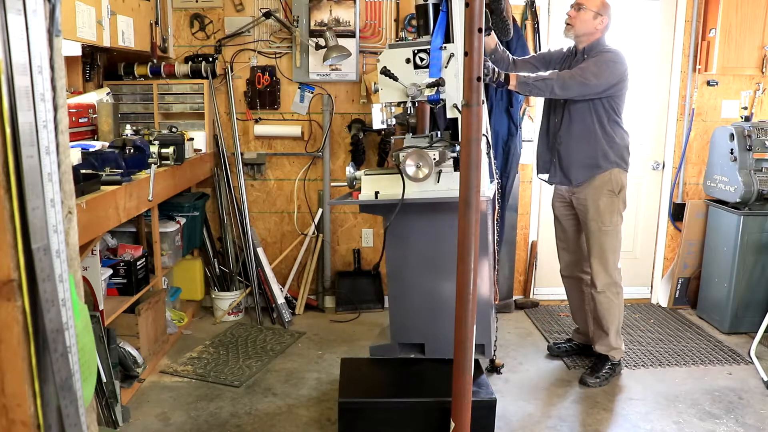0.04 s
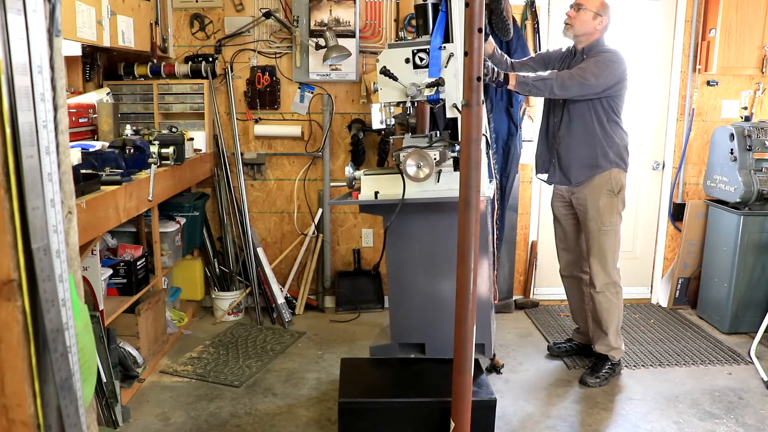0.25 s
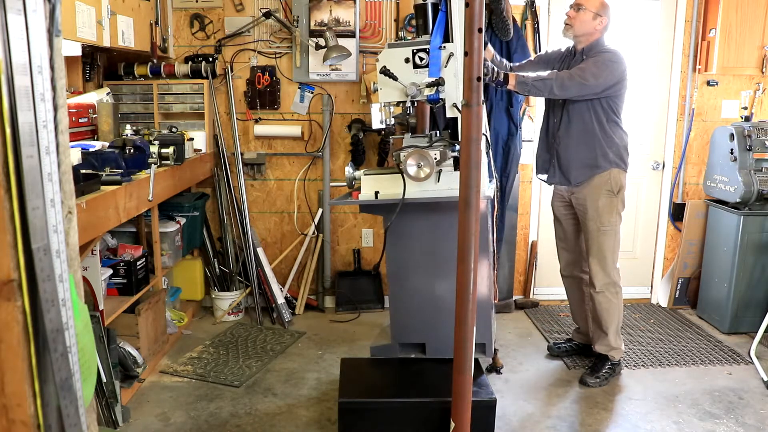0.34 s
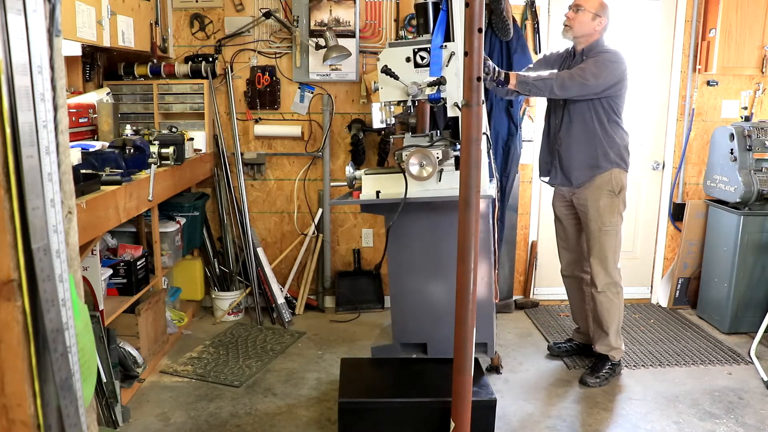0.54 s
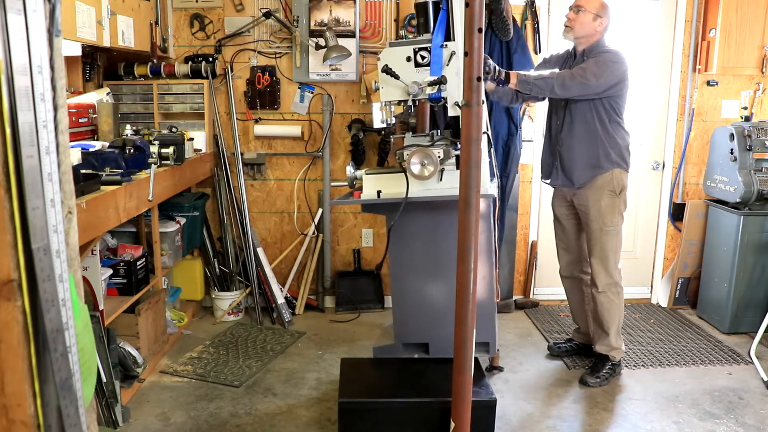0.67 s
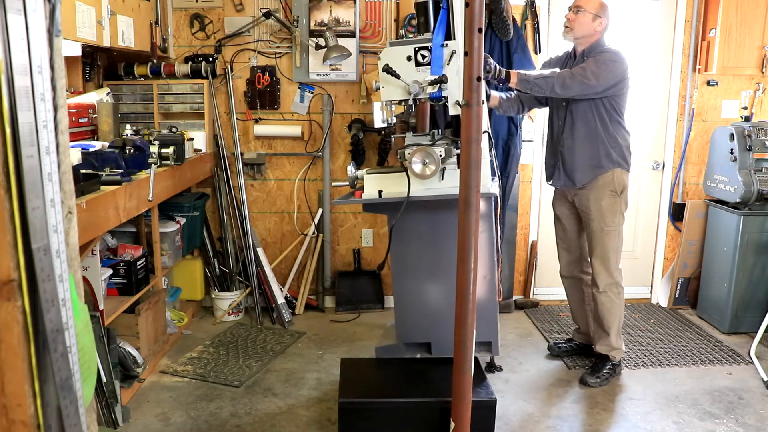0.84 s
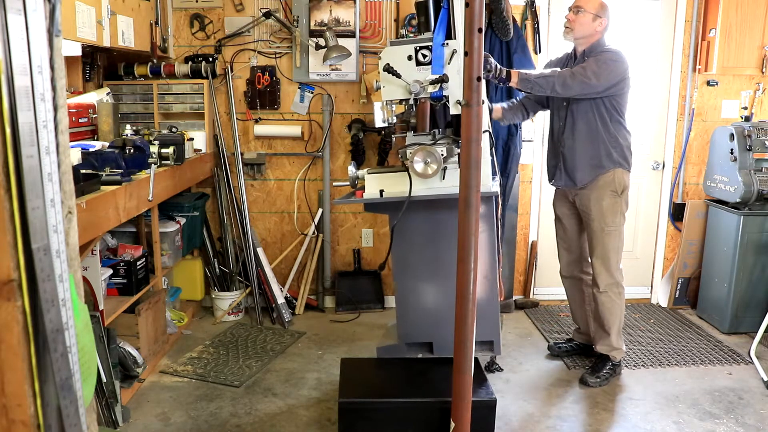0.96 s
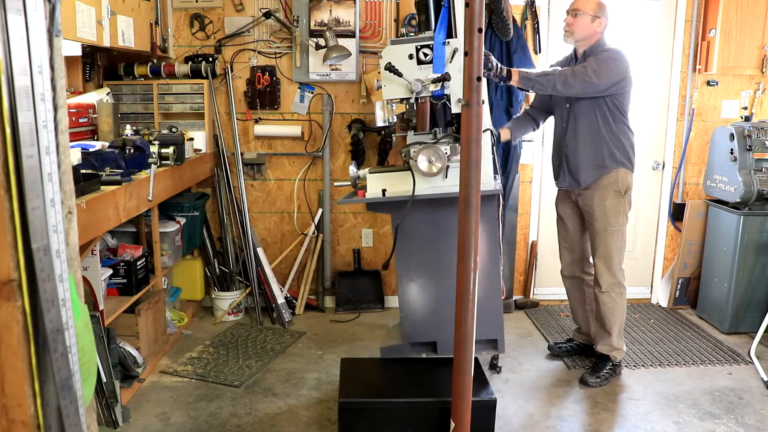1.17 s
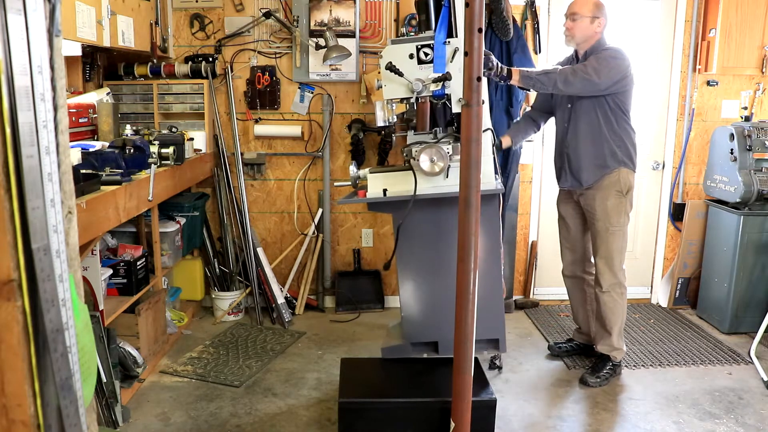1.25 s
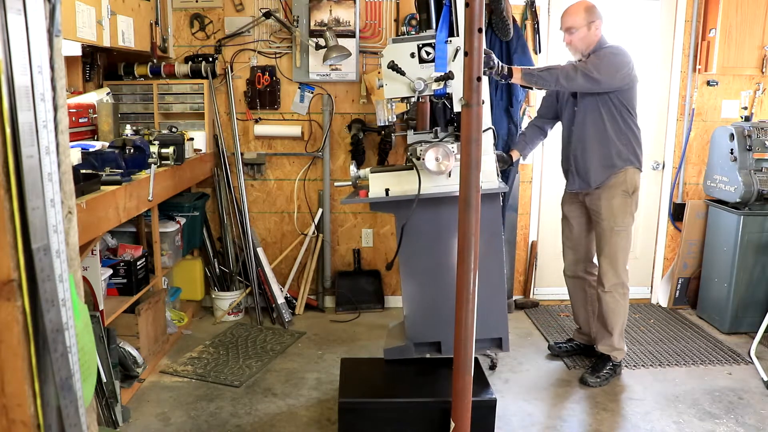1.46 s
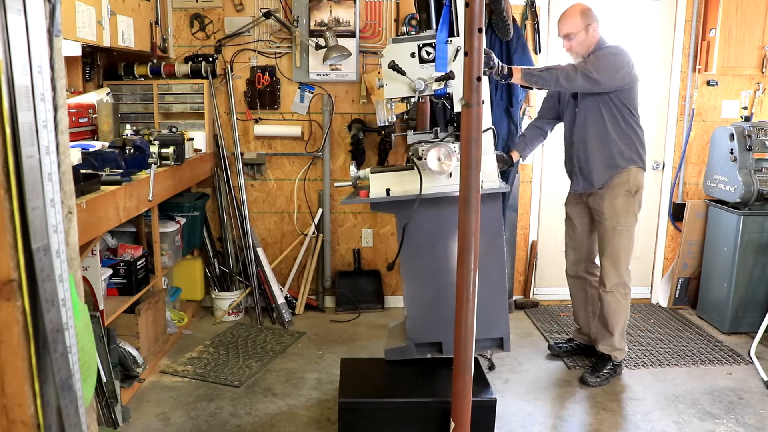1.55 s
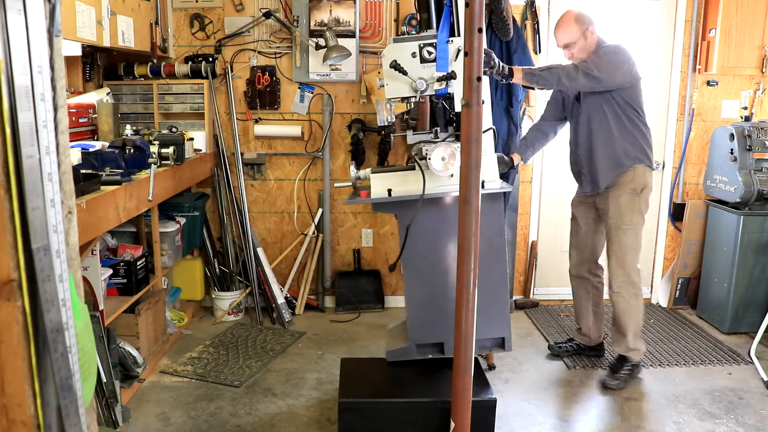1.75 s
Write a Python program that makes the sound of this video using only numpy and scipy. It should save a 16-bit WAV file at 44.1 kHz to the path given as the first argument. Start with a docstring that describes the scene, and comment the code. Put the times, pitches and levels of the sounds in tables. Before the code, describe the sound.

Rapid ratchet ticks and clanking links as a chain is hauled through a hoist, then stops

```python
"""Hand chain hoist, one pull

A hand chain is hauled once through a hoist in a cluttered workshop: pawl ticks and link clanks (short noise cracks
over bounced metal modes), housing ring (decaying sines), slack chain (dense random clinks), thuds (tone plus noise).
A late clank and thud follow. Low noise rumbles under the pull, the room adds a decaying noise tail,
and the previous pull dies away as fading noise over a quiet noise floor."""
import sys
import numpy as np
from scipy import signal
from scipy.fft import rfft, irfft
from scipy.io import wavfile
from scipy.ndimage import uniform_filter1d

SR = 44100
rng = np.random.default_rng(int(sys.argv[2]) if len(sys.argv) > 2 else 0)


def materialize(psi):
    """Save the field psi as 16-bit PCM at rate SR to the path in sys.argv[1].

    A 1-D psi becomes a single channel; in a 2-D psi each row is a channel.
    """
    bounded = np.clip(np.atleast_2d(psi).T, -1, 1)
    quanta = np.round(bounded * 32767).astype(np.int16)
    wavfile.write(sys.argv[1], SR, quanta)


N = 79380
HIT_SIZE = 8192  # samples per blow

# pawl ticks: start_s, level_db, housing_ring_db, hollow_knock_db, chatter_s
PAWL_TICKS = [(0.198, -30, -33, -53, 0.0032), (0.2196, -13.5, -44, -30, 0.0032),
              (0.2469, -9.5, -51, -31, 0.0046), (0.2843, -35, -9, -11, 0.0067),
              (0.3034, -7, -41, -17, 0.0052), (0.339, -6.5, -41, -29, 0.0039),
              (0.3751, -9, -22, -8.5, 0.007), (0.4157, -9.5, -30.5, -16.5, 0.0041),
              (0.4542, -8.5, -24, -14, 0.0058), (0.5072, -4.5, -41, -16.5, 0.0039),
              (0.5506, -6.5, -24, -23, 0.0049), (0.5856, -6.5, -21, -19.5, 0.0035),
              (0.6179, -6.5, -14.5, -21, 0.0034), (0.647, -7.5, -26, -47, 0.0062),
              (0.6771, -6.5, -33, -14.5, 0.0052), (0.7107, -7, -16, -15, 0.0028),
              (0.7335, -6.5, -45, -12, 0.0049), (0.7665, -6, -34, -11, 0.0039),
              (0.791, -6, -12.5, -9.5, 0.0036), (0.823, -5, -46, -10.5, 0.0026),
              (0.8545, -5, -40, -25, 0.0024), (0.8813, -6, -12.5, -19, 0.0048),
              (0.9117, -7, -22, -11.5, 0.0035), (0.9408, -5, -47, -29, 0.0038),
              (0.9621, -9, -33, -12.5, 0.0074), (0.99, -6.5, -31, -42, 0.0046),
              (1.016, -5, -16.5, -23, 0.0024), (1.037, -4.5, -16, -16, 0.0046),
              (1.0618, -9, -16, -35, 0.0042), (1.0817, -5.5, -49, -41, 0.0097),
              (1.102, -7, -50, -25.5, 0.0054), (1.1254, -5, -22.5, -19, 0.0035),
              (1.149, -6.5, -44, -19, 0.0036), (1.1741, -11, -13, -33, 0.0092),
              (1.203, -9.5, -12, -24, 0.0048), (1.23, -10.5, -14.5, -18, 0.0081),
              (1.2596, -5, -14, -19, 0.0064), (1.2864, -10, -15, -13.5, 0.0048),
              (1.3216, -9, -38, -28, 0.0021), (1.35, -8, -33, -10.5, 0.0038),
              (1.3802, -8.5, -25, -34, 0.0054), (1.4106, -9.5, -31, -10.5, 0.0045),
              (1.4425, -10, -24, -14, 0.0037), (1.527, -35, -26, -12, 0.0029),
              (1.593, -21.5, -24, -10, 0.0038), (1.6184, -50, -14, 2, 0.0036),
              (1.6367, -33, -32, -7, 0.0035), (1.7833, -36, -25, -28, 0.0032)]
# link clanks: start_s, level_db, low_housing_ring_db, high_housing_ring_db, brightness_db, chatter_s
LINK_CLANKS = [(0.1477, -25, -21, -8, -2.5, 0.0067), (0.2182, -22.5, -39, 0, 14, 0.0021),
               (0.241, -18, -38, -12, 1, 0.0047), (0.2622, -12, -34, -27, 2.5, 0.005),
               (0.2845, -13, -18, -7, -7.5, 0.0051), (0.3358, -9.5, -48, -11, -0.5, 0.008),
               (0.365, -12, -34, -8, -5, 0.0038), (0.3811, -8.5, -14.5, -20, -5, 0.0061),
               (0.4388, -2, -41, -17, 2.7, 0.0046), (0.5002, -8.5, -7.5, -11, -1.5, 0.0076),
               (0.5638, -2.5, -37, -17.5, 5.5, 0.0039), (0.6033, -3.5, -15, -10, 3.5, 0.0081),
               (0.6525, -9.5, -33, -3, -1, 0.0096), (0.685, -6, -40, -23, -0.7, 0.01),
               (0.7245, -8, -31, -10.5, 3, 0.0049), (0.764, -4, -7, -12, -2, 0.0042),
               (0.8123, -10.5, -14, -16, -3, 0.0062), (0.8557, -7, -43, -12.5, -2.5, 0.0036),
               (0.8891, -5, -9, -18, -3, 0.0049), (0.9615, -4, -12, -42, 0, 0.0034),
               (1.0272, -3, -13.5, -11.5, 6, 0.0091), (1.0834, -8.5, -45, 1.5, -2.5, 0.0068),
               (1.1175, -5, -39, -10.5, -1.5, 0.0048), (1.1861, -7, -15.5, -5.5, -6, 0.0067),
               (1.2329, -14, -27, -28, -5.5, 0.0084), (1.263, -9.5, -31, -9, -8, 0.005),
               (1.3025, -12.5, -11, -29, -8, 0.0036), (1.3434, -5, -11, -8.5, -5.5, 0.0055),
               (1.4193, -9.5, -6.5, -23, -2.3, 0.01), (1.5644, -14.5, -9.5, -10, -3.5, 0.0078)]
# pawl resonances: pitch_hz, level_db, t60_s
PAWL_RESONANCES = [(5400, -9, .02), (6100, -8, .02), (6700, -3, .022), (7050, -2, .03), (7700, -4, .022),
                   (8330, -3, .02), (9220, -5, .02), (10500, -7, .015), (11300, -9, .015),
                   (12600, -18, .015)]
# chain link resonances: pitch_hz, level_db, t60_s
LINK_RESONANCES = [(1805, -4, .035), (2440, -12, .045), (2735, -6, .055), (3232, -4, .05), (3390, -6, .04),
                   (3612, -4, .04), (3868, -2, .05), (4200, -5, .035), (4530, -2, .05), (4990, -5, .04)]


def undb(db):
    """dB to amplitude gain."""
    return 10 ** (np.asarray(db) / 20)


def fall(t60_s, size=HIT_SIZE):
    """Exponential decay, 60 dB down at t60_s."""
    return np.exp(-np.log(1000) * np.arange(size) / SR / t60_s)


def swell(rise_s, size=HIT_SIZE):
    """Exponential approach to 1 with time constant rise_s."""
    return 1 - np.exp(-np.arange(size) / SR / rise_s)


def shape(x, spectrum):
    """Filter x by a (pitch_hz, level_db) table, interpolated over log frequency."""
    hz, db = np.array(spectrum, float).T
    size = x.shape[-1]
    bin_hz = np.maximum(np.arange(size // 2 + 1) * SR / size, 1)
    gain = undb(np.interp(np.log(bin_hz), np.log(hz), db))
    return irfft(rfft(x) * gain, size)


def colour(x, spectrum):
    """Shape x by a spectrum, to rms 1 overall."""
    y = shape(x, spectrum)
    return y / np.sqrt(np.mean(y ** 2))


def tint(x):
    """Give each row its own random, smooth unevenness across the spectrum."""
    tint_db = 1.4
    bumps = np.repeat(rng.standard_normal((len(x), 17)), HIT_SIZE // 32, axis=1)[:, :HIT_SIZE // 2 + 1]
    smooth = uniform_filter1d(bumps, size=HIT_SIZE // 64, axis=1)
    return irfft(rfft(x) * undb(tint_db * smooth), HIT_SIZE)


def ring(modes, scatter_db, count, detune=0.):
    """Sum of decaying sines, one row per blow; strength and pitch of each mode vary by chance."""
    out = np.zeros((count, HIT_SIZE))
    chance = rng.standard_normal((count, len(modes), 2))
    for k, (hz, db, t60_s) in enumerate(modes):
        size = HIT_SIZE if t60_s > .1 else HIT_SIZE // 2  # short modes need fewer samples
        t = np.arange(size) / SR
        gain = undb(db + scatter_db * chance[:, k, :1])
        mode_hz = hz * (1 + detune * chance[:, k, 1:])
        out[:, :size] += gain * fall(t60_s, size=size) * np.sin(2 * np.pi * mode_hz * t)
    return out


def place(starts_s, sounds):
    """Add each sound at its start time."""
    out = np.zeros(N + HIT_SIZE)
    for start_s, x in zip(starts_s, sounds):
        first = int(start_s * SR)
        out[first:first + HIT_SIZE] += x
    return out[:N]


def unit(x):
    """Scale each row to a short-term rms maximum of 1."""
    power = uniform_filter1d(x ** 2, size=128, axis=1)
    return x / np.sqrt(np.max(power, axis=1, keepdims=True) + 1e-12)


def blows(modes, crack_spectrum, rise_share, chatter_s, ring_db):
    """Metal on metal: quick bounces excite the modes, over a short noise crack; peak near 1."""
    mode_scatter_db, pitch_scatter = 1, 0.0072
    count = len(chatter_s)
    t = np.arange(HIT_SIZE) / SR / np.clip(chatter_s, .0007, .02)[:, None]  # in chatter times
    env = (1 - np.exp(-t / rise_share)) * np.exp(-t)

    noise = rng.standard_normal((count, HIT_SIZE))
    sparse = np.abs(noise) > 1.8  # only the strongest samples become bounces
    bounces = (noise * env * sparse)[:, :HIT_SIZE // 4]
    resonance = ring(modes, mode_scatter_db, count, pitch_scatter)
    rung = signal.fftconvolve(resonance, bounces, axes=1)[:, :HIT_SIZE]

    # level flutter within the crack: 11 dB noise, averaged over 64 samples
    flutter = uniform_filter1d(rng.standard_normal((count, HIT_SIZE)), size=64, axis=1)
    grain = undb(11 * flutter)
    crack = tint(colour(rng.standard_normal((count, HIT_SIZE)), crack_spectrum)) * env * grain
    return unit(unit(crack) + undb(ring_db) * unit(rung)) / 2.8


def shop_floor():
    """Steady coloured noise of the quiet shop, mid and side."""
    # spectrum: pitch_hz, level_db
    floor_spectrum = [(18, -44), (30, -45), (403, 7), (691, 2.5), (827, -2), (1100, 2), (1280, 12),
                      (14000, -101)]
    return colour(rng.standard_normal((2, N)), floor_spectrum) * undb(-52.5)


def earlier_pull():
    """The previous pull dying away: coloured noise in exponential decay, mid and side."""
    fading_db, fading_t60_s = -40.5, 0.79
    # spectrum: pitch_hz, level_db
    fading_spectrum = [(35, -76), (60, -30), (906, -17), (1160, -7.5), (1280, -20), (1500, -14.5),
                       (4680, -20), (5750, -19), (14000, -47)]
    noise = colour(rng.standard_normal((2, N)), fading_spectrum)
    return noise * fall(fading_t60_s, size=N) * undb(fading_db)


def room(x):
    """Convolve with a dense noise tail; each octave band decays at its own rate."""
    rise_s, size = 0.0018, HIT_SIZE * 3
    # room decay: pitch_hz, t60_s
    room_decay = [(250, 0.54), (1000, 0.69), (4000, 0.32), (10000, 0.26)]
    decay_hz, decay_t60_s = np.array(room_decay).T
    tail = 0
    for hz in 125 * 2. ** np.arange(7):
        low_hz = hz / np.sqrt(2)
        high_hz = min(hz * np.sqrt(2) * (1 + (hz > 5000)), 18000)  # top band reaches higher
        sos = signal.butter(2, [low_hz, high_hz], "band", fs=SR, output="sos")
        band = signal.sosfilt(sos, rng.standard_normal(size))
        t60_s = np.interp(np.log(hz), np.log(decay_hz), decay_t60_s)
        tail = tail + band * fall(t60_s, size=size)
    tail = tail * swell(rise_s, size=size)
    return signal.fftconvolve(x, tail / np.sqrt(np.sum(tail ** 2)))[:N]


def rumble():
    """Low rumble of the loaded hoist: coloured noise under an uneven level."""
    # level curve: time_s, level_db
    rumble_levels = [(0.25, -60), (0.298, -53), (0.43, -74), (0.51, -37.5), (0.768, -68.5), (0.984, -32),
                     (1.151, -44.5), (1.408, -50), (1.5, -50)]
    # spectrum: pitch_hz, level_db
    rumble_spectrum = [(30, -1.5), (70, -3.5), (150, -10), (280, -3.5), (500, -67)]
    s, db = np.array(rumble_levels).T
    level = undb(np.interp(np.arange(N) / SR, s, db, left=-90, right=-90))
    return colour(rng.standard_normal(N), rumble_spectrum) * uniform_filter1d(level, size=900)


def thuds():
    """Soft knocks: decaying tones, rough noise around the pitch and a low boom."""
    thud_t60_s, noise_db = 0.12, -6
    # thuds: start_s, level_db, pitch_hz, boom_db
    thud_events = [(0.157, -34, 358, -22), (0.2185, -31, 766.5, -43), (1.597, -22.5, 359, -1),
                   (1.639, -31.5, 390, -20)]
    # overtones: pitch_multiple, level_db
    overtones = [(1.35, -9.5), (2.5, -1)]
    # noise spectrum: pitch_multiple, level_db
    noise_spectrum = [(.3, -59), (.6, 7), (1, -1), (1.8, -2), (2.5, -11), (6, -15), (20, -64)]
    # boom: pitch_hz, level_db, t60_s
    boom_modes = [(147, 0, 0.062)]
    s, db, pitch_hz, boom_db = np.array(thud_events).T
    partials = [(0.96, 0)] + list(overtones)
    tones, rough = [], []
    for hz in pitch_hz:
        modes = [(hz * multiple, level_db, thud_t60_s) for multiple, level_db in partials]
        tones.append(ring(modes, 0.48, 1)[0])
        spectrum = [(hz * multiple, level_db) for multiple, level_db in noise_spectrum]
        rough.append(colour(rng.standard_normal(HIT_SIZE), spectrum))
    noise = np.array(rough) * fall(thud_t60_s) * undb(noise_db)
    boom = ring(boom_modes, 0, len(s)) * undb(boom_db)[:, None] * (1 - fall(0.02))
    return place(s, (np.array(tones) + noise + boom) * swell(0.0015) * undb(db)[:, None])


def rattle():
    """Slack chain: dense random clinks of decaying noise, also ringing the link and pawl modes."""
    clinks_per_s, mean_spread_db, max_spread_db = 500, 6, 12
    clink_t60_s, ring_db = 0.017, -13
    # level curve: time_s, level_db
    rattle_levels = [(0.208, -47.5), (.27, -32), (.39, -23), (.45, -39), (.69, -25), (0.911, -26),
                     (1.29, -27), (1.439, -23), (1.501, -58.5), (1.598, -33), (1.68, -69), (1.75, -62.5),
                     (1.8, -43)]
    # spectrum: pitch_hz, level_db
    rattle_spectrum = [(24, -57), (40, -58), (297, -14.5), (422, -2.5), (697, -24.5), (990, 1.5),
                       (1370, -14.5), (6820, -9), (10700, -21.5), (16000, -70)]
    draw = rng.random((2, N))
    struck = draw[0] < clinks_per_s / SR
    spread_db = np.minimum(-mean_spread_db * np.log(1 - draw[1]), max_spread_db)
    power = signal.fftconvolve(struck * undb(spread_db) ** 2, fall(clink_t60_s) ** 2)[:N]
    clinks = np.sqrt(np.abs(power)) * rng.standard_normal(N)

    modes = ring(LINK_RESONANCES + PAWL_RESONANCES, 0, 1)[0]
    rung = signal.fftconvolve(clinks, modes)[:N]
    s, db = np.array(rattle_levels).T
    level = undb(np.interp(np.arange(N) / SR, s, db, left=-90))
    return level * (colour(clinks, rattle_spectrum) + undb(ring_db) * rung / rung.std())


def housing():
    """Steel housing rings after clanks and ticks; its low tone starts late, choked after the next clank."""
    clank_ring_db = -4
    low_lag_s, low_rise_s, high_rise_s = 0.01002, 0.0061, 0.0048
    choke_s, low_detune = 0.012, 0.0094
    # low ring: pitch_hz, level_db, t60_s
    low_modes = [(396, -10, .1), (429, 3, 0.18)]
    # high ring: pitch_hz, level_db, t60_s
    high_modes = [(921, -11.5, .15), (982.8, -1, 0.15), (1024, -5, 0.14), (1115, -2.5, 0.076),
                  (1162, -15, 0.19)]
    t = np.arange(HIT_SIZE) / SR
    clanks, ticks = np.array(LINK_CLANKS), np.array(PAWL_TICKS)
    s = np.r_[clanks[:, 0], ticks[:, 0]]
    clank_db = clank_ring_db + clanks[:, 1]
    tick_db = ticks[:, 1] + ticks[:, 2]
    low_db = np.r_[clank_db + clanks[:, 2], tick_db]
    high_db = np.r_[clank_db + clanks[:, 3], tick_db]

    ends_s = np.r_[clanks[:, 0], N / SR]
    left_s = ends_s[np.searchsorted(ends_s, s, side="right")] - s  # time to the next clank
    choke = np.exp(-np.maximum(t - left_s[:, None], 0) / choke_s)
    low = ring(low_modes, 1, len(s), low_detune) * swell(low_rise_s) * choke
    high = ring(high_modes, 2.8, len(s), low_detune / 4) * swell(high_rise_s)
    return place(s + low_lag_s, low * undb(low_db)[:, None]) + place(s, high * undb(high_db)[:, None])


def links():
    """Links clank into the wheel pockets; the last also strikes a looser part."""
    clank_db, ring_db, rise_share = 1, -9, 0.099
    # crack spectrum: pitch_hz, level_db
    clank_spectrum = [(150, -51), (600, -26), (1300, -11), (1800, -1.5), (2300, -13.5), (3300, -1),
                      (4900, -0.5), (6200, -13.5), (10000, -19.5), (16000, -108)]
    # looser part: pitch_hz, level_db, t60_s
    loose_modes = [(1980, -31, .04), (3810, -22, .05), (3960, -26, .04), (4650, -28, .035)]
    s, db, _, _, bright_db, chatter_s = np.array(LINK_CLANKS).T
    clank = blows(LINK_RESONANCES, clank_spectrum, rise_share, chatter_s, ring_db) * undb(clank_db)
    dull = uniform_filter1d(clank, size=8, axis=1)
    treble = clank - dull
    clank = dull * undb(-bright_db)[:, None] + treble
    return place(s, clank * undb(db)[:, None]) + place(s[-1:], ring(loose_modes, 0, 1))


def pawl():
    """Pawl ticks over its ratchet: bright metal blows with hollow knocks of varying strength."""
    tick_db, ring_db, rise_share = -2, -3, 0.24
    # crack spectrum: pitch_hz, level_db
    tick_spectrum = [(1000, -12.5), (4000, -25), (6000, 3.5), (8500, 6), (11000, -1), (13000, -16.5),
                     (16000, -74)]
    # hollow knock: pitch_hz, level_db, t60_s
    knock_modes = [(583, -4, 0.051), (674.6, -1, 0.038), (771, -5, 0.068)]
    s, db, _, knock_db, chatter_s = np.array(PAWL_TICKS).T
    ticks = blows(PAWL_RESONANCES, tick_spectrum, rise_share, chatter_s, ring_db) * undb(tick_db)
    knock = ring(knock_modes, 3.3, len(s), 0.028) * undb(knock_db)[:, None] * (1 - fall(0.012))
    return place(s, (ticks + knock) * undb(db)[:, None])


def scene():
    """Hoist, room, fading earlier pull and quiet shop; almost mono."""
    room_db, housing_room_db, quiet_side_db = -8, -6, -35
    # side filter on the room tail: pitch_hz, level_db
    side_spectrum = [(60, -23), (380, -43), (2380, -46.5), (8120, -33.5), (15000, -21)]
    quiet = shop_floor() + earlier_pull()
    body = housing()
    chain = thuds() + rattle() + links() + pawl()
    sent = chain + undb(housing_room_db) * body
    mid = chain + body + rumble() + undb(room_db) * room(sent) + quiet[0]
    side = shape(room(sent), side_spectrum) + undb(quiet_side_db) * quiet[1]
    return np.array([mid + side, mid - side])


def record(dry):
    """The camera thins the bass, rounds the peaks and cuts the top."""
    bass_cut_hz, top_hz, headroom = 60, 15900, 0.72
    high_pass = signal.butter(2, bass_cut_hz, "high", fs=SR, output="sos")
    thin = signal.sosfilt(high_pass, dry)
    soft = headroom * np.tanh(thin / headroom)
    low_pass = signal.ellip(10, .2, 80, top_hz, fs=SR, output="sos")
    return signal.sosfilt(low_pass, soft)


dry = scene()
out = record(dry)
materialize(out)
```